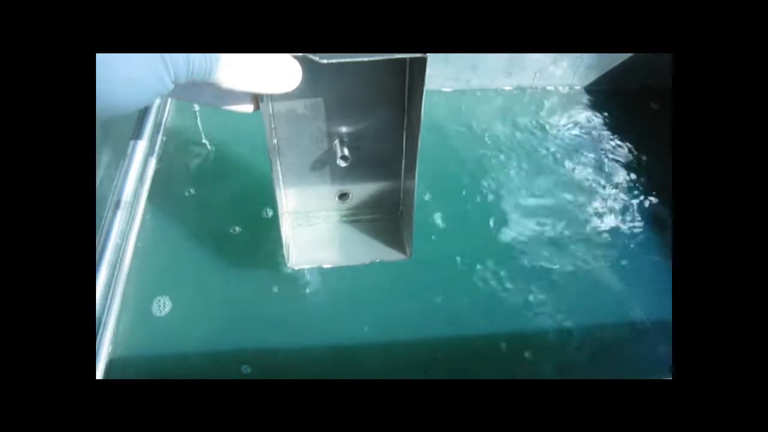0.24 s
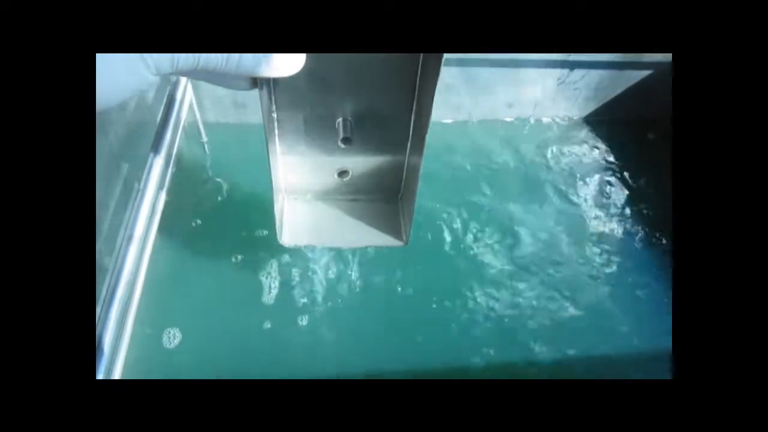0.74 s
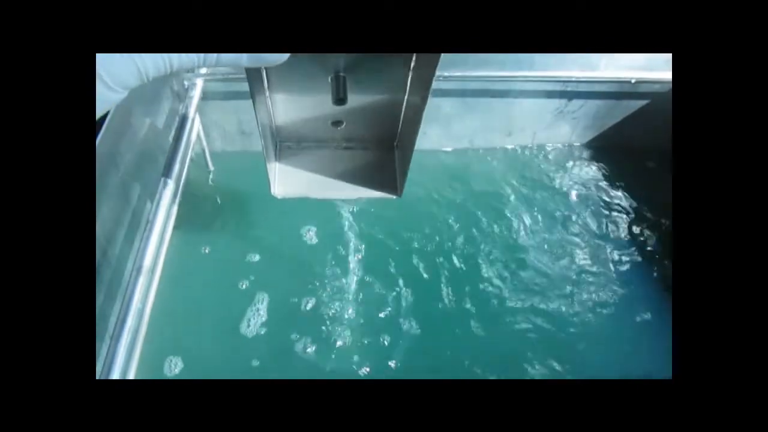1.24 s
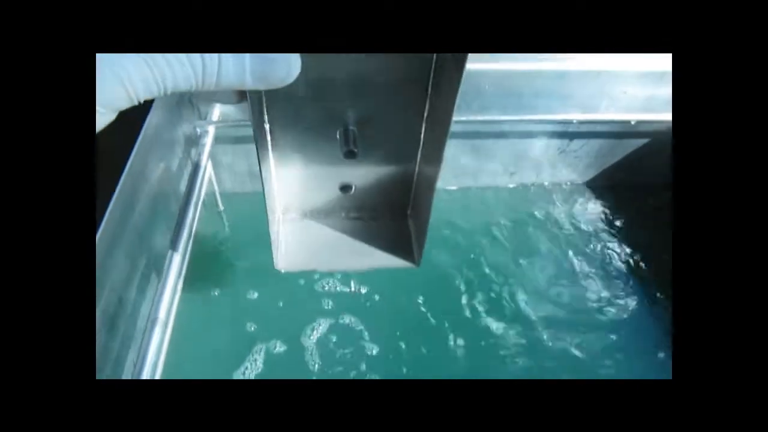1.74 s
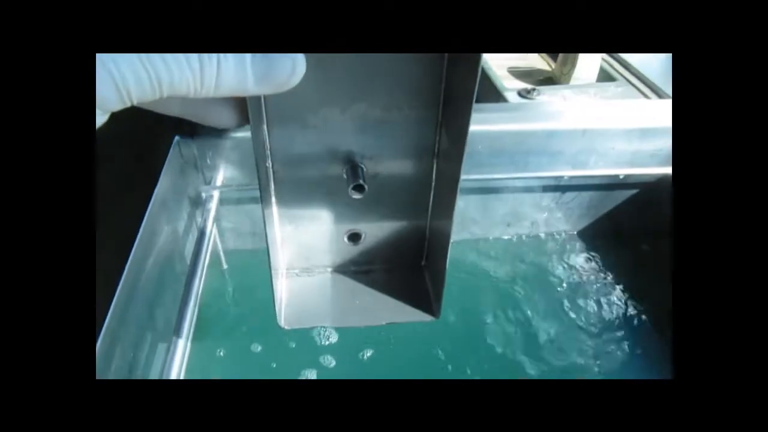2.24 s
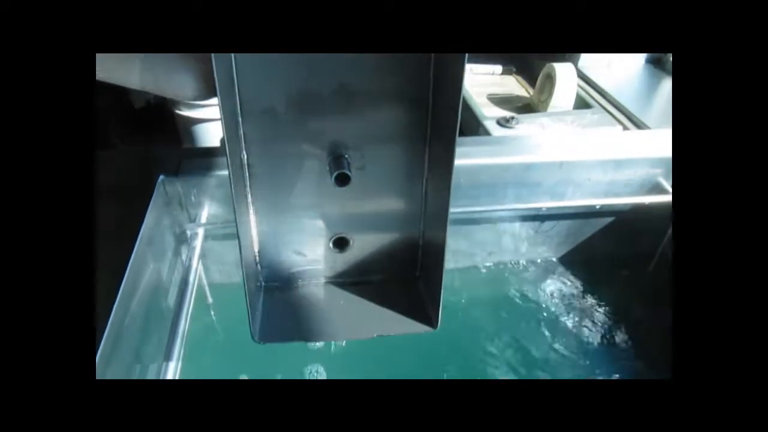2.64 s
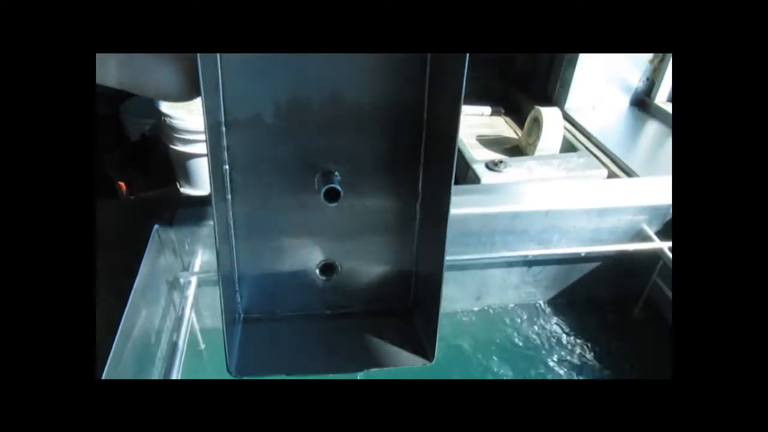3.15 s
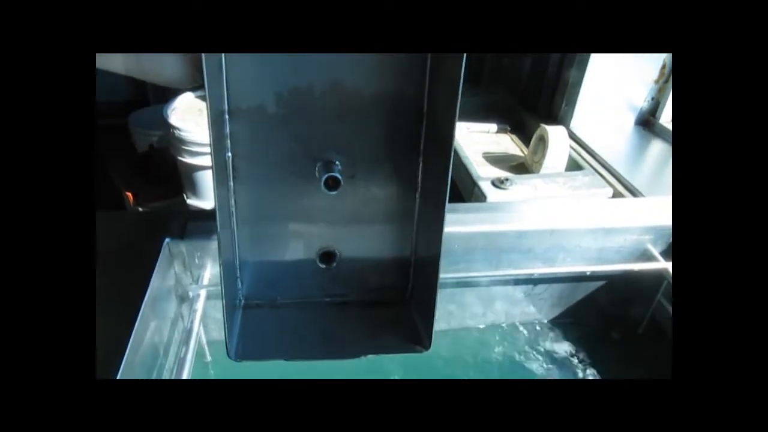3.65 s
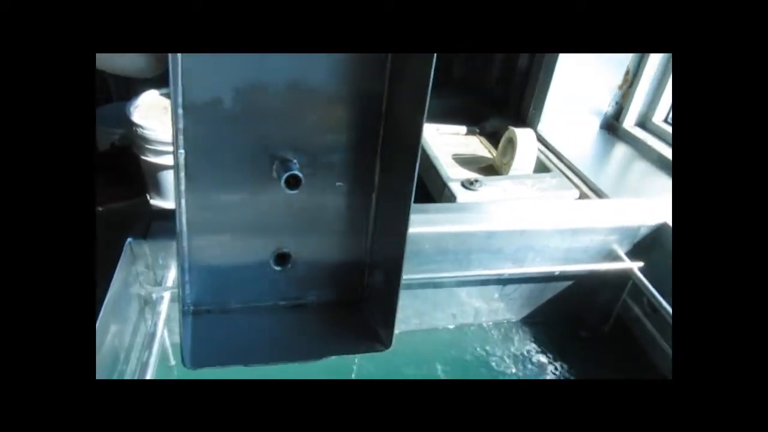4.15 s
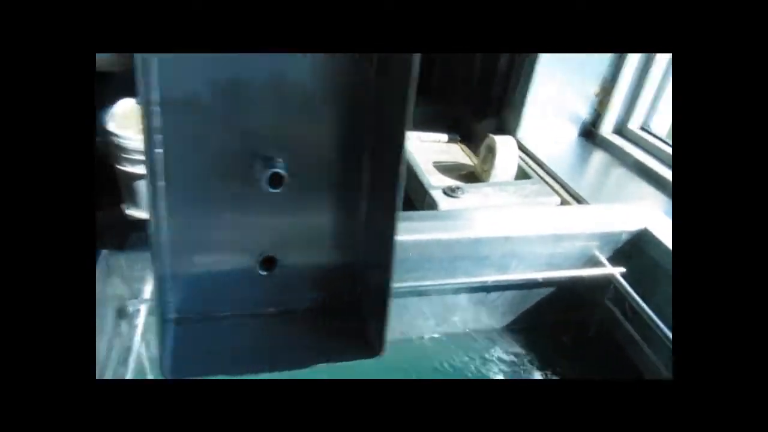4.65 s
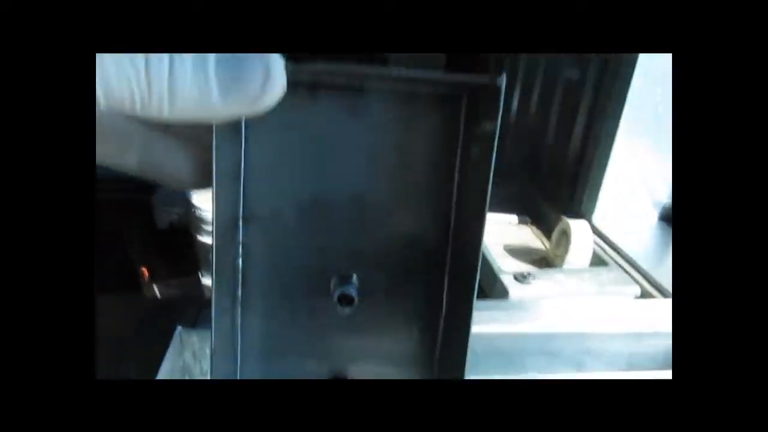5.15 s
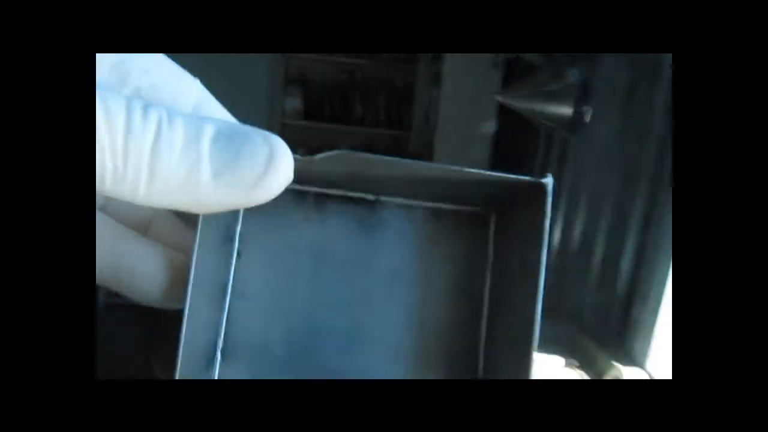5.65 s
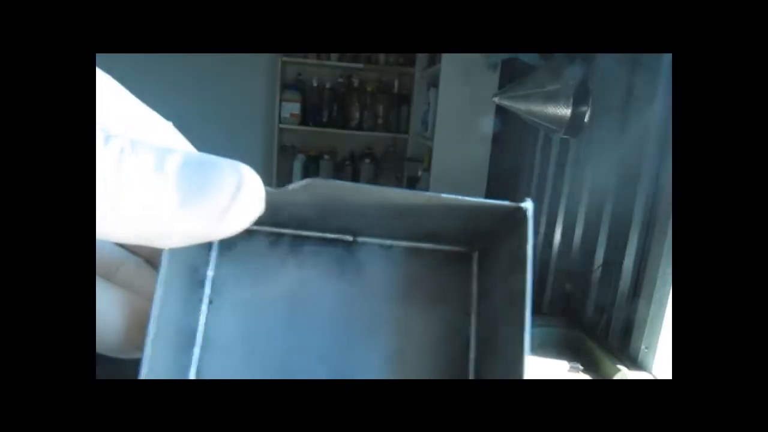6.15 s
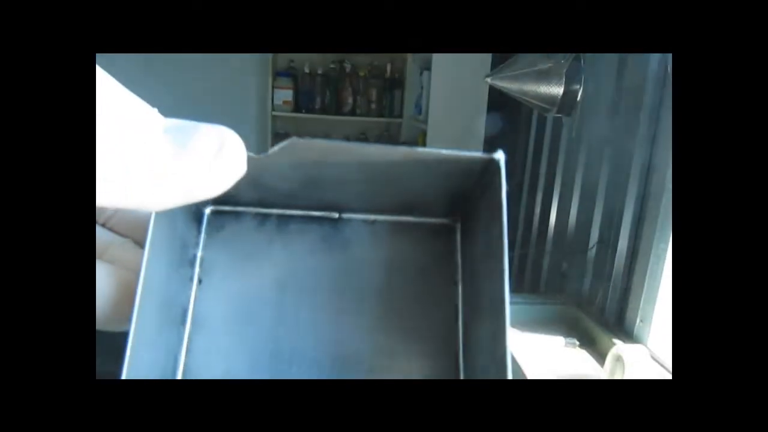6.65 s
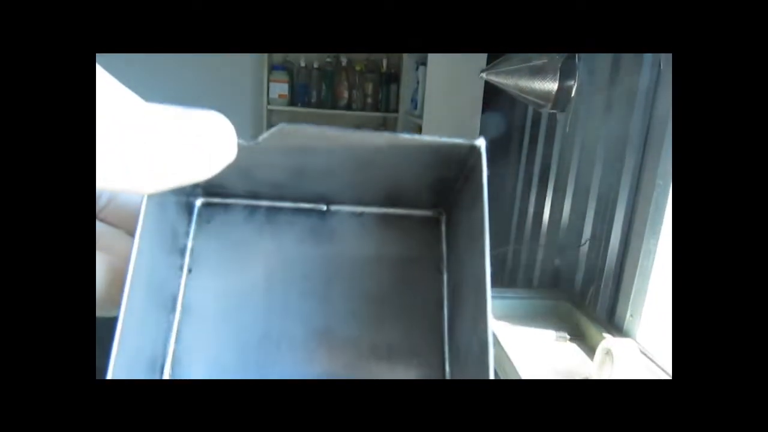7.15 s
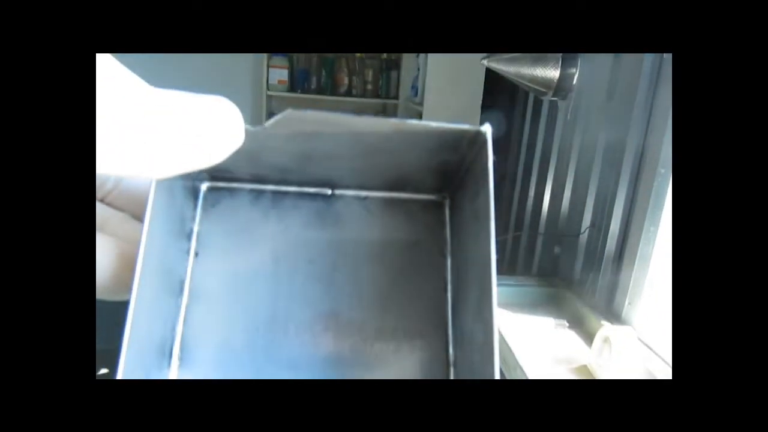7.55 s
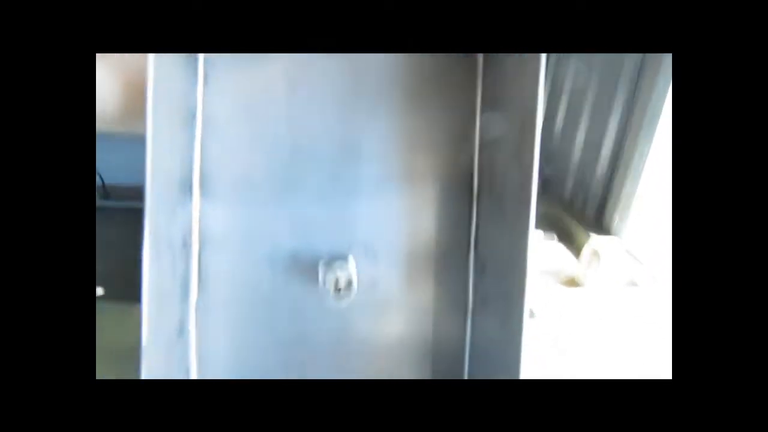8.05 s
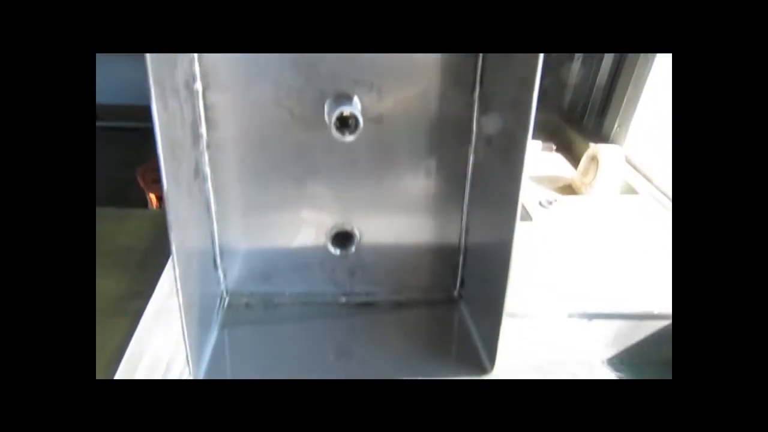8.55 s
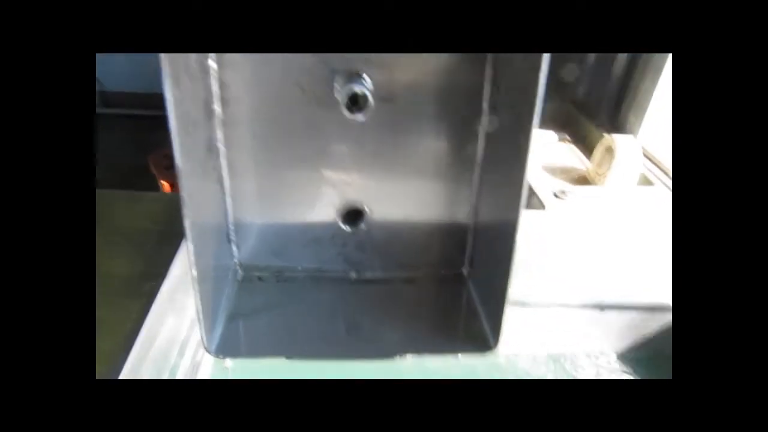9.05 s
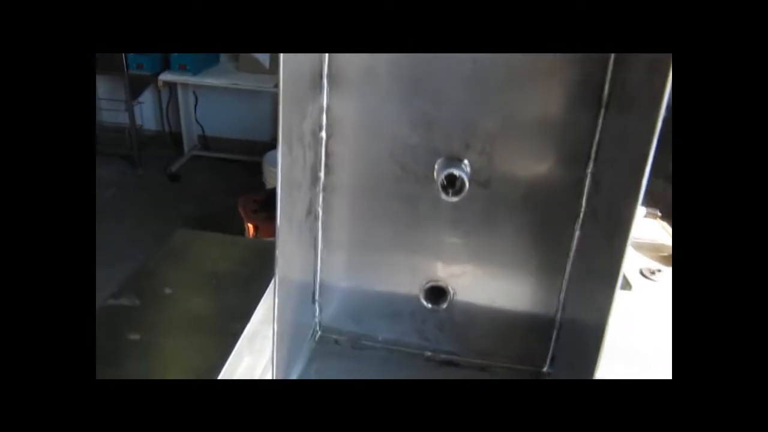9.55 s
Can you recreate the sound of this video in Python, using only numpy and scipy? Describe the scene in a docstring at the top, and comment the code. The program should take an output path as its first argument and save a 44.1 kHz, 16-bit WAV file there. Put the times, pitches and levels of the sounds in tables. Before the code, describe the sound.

A steady, high sizzle of countless tiny bubbles comes from an ultrasonic cleaning bath, near enough to slightly overload the microphone. A softer rush lies beneath it, with a faint buzzing pulse, and a barely audible low bump occurs early. The hiss eases and drops slightly in pitch as a raised steel tray shields it, then swells back a little near the end, keeping its lower tone.

```python
"""An ultrasonic cleaning tank hisses close to a small camera as countless tiny bubbles collapse in it.
The hiss is strongest around 8-10 kHz, has a softer, lower rush under it and pulses at twice the mains
rate. A steel tray is lifted out and held in front of the camera, shading the hiss and lowering its pitch;
then the camera turns to the tank's side. Early on, the hand holding it makes one soft bump. The hiss
overloads the microphone, which flattens it into a dense, even sizzle; its treble flicks wide at random."""
import sys
import numpy as np
from scipy import signal
from scipy.fft import rfft, irfft
from scipy.io import wavfile
from scipy.ndimage import uniform_filter1d

SR = 44100
rng = np.random.default_rng(int(sys.argv[2]) if len(sys.argv) > 2 else 0)


def int16_out(signal):
    """Quantize to a 16-bit WAV file."""
    q = np.round(np.clip(np.atleast_2d(signal).T, -1, 1) * 32767)
    wavfile.write(sys.argv[1], SR, q.astype(np.int16))


N = 432180
TIME = np.arange(N) / SR


def undb(db):
    """Turn decibels into a number to multiply the sound by."""
    return 10 ** (np.asarray(db) / 20)


def colour(sound, points):
    """Shape the tone along (Hz, dB) points, fading it beyond them, and scale it to a strength of 1."""
    hz, db = np.transpose(points)
    freqs = np.fft.rfftfreq(N, 1 / SR) + 1
    curve = undb(np.interp(np.log(freqs), np.log(hz), db))
    edge_fade = np.minimum(freqs / hz[0], 1) ** 2 * np.minimum(hz[-1] / freqs, 1) ** 10
    shaped = irfft(rfft(sound) * curve * edge_fade, N)
    return shaped / shaped.std()


def waver(per_s):
    """A smooth random drift, about 1 in size, heading for a new value per_s times a second."""
    hold = int(SR / per_s)
    steps = np.repeat(rng.standard_normal(N // hold + 1), hold)
    smooth = uniform_filter1d(uniform_filter1d(steps, hold), hold)[:N]
    return smooth / smooth.std()


def mains_pulse(depth, pulse_hz=120):
    """The parts that shake the water swell on each half wave of the mains power."""
    return 1 + depth * np.cos(2 * np.pi * pulse_hz * TIME)


def collapses(spread_db):
    """Countless bubble collapses of uneven size, so dense that they merge into noise."""
    return rng.standard_normal(N) * undb(spread_db * rng.standard_normal(N))


def tank_hiss(shaded, beside, loss_db):
    """Collapsing bubbles ring the steel tank; the path to the camera decides which pitches lead."""
    # The tone of the hiss over the open water, behind the raised tray and beside the tank.
    # Each row: frequency in Hz, relative level in dB.
    open_bath = [(2500, -24.5), (4200, -17), (4900, -15), (6300, -13), (7300, -9.5), (8100, -7),
                 (8500, -3.5), (9000, -2), (9700, 0), (10300, -1), (11000, -4.5), (12200, -8),
                 (14000, -15.5), (15600, -21)]
    behind_tray = [(2500, -28), (4200, -18.5), (4900, -12.5), (6300, -12), (7400, -7.5), (8050, 1.7),
                   (8500, 1), (9000, -1), (9700, 0.2), (10300, -4.5), (11000, -9.5), (12200, -13.5),
                   (14000, -17.5), (15600, -24)]
    beside_tank = [(2500, -25.5), (4000, -19.5), (5000, -13), (6300, -10.5), (7300, -3.5), (8100, -0.5),
                   (8500, 1), (9000, -4), (9700, -6.5), (10300, -9), (11000, -12.5), (12200, -13.5),
                   (14000, -23.5), (15600, -30)]
    paths = [colour(collapses(spread_db=2.0), tone) for tone in (open_bath, behind_tray, beside_tank)]
    shares = np.clip([1 - shaded - beside, shaded, beside], 0, 1)
    hiss = np.sum(np.sqrt(shares / shares.sum(axis=0)) * paths, axis=0)
    # The hiss loses less to the tray than the rush does, and is a little stronger beside the tank.
    level_db = -12 - 0.36 * loss_db + 1.5 * beside
    waver_db = 0.82 * waver(per_s=12)  # the bubble clouds shift
    return hiss * undb(level_db + waver_db) * mains_pulse(depth=0.085)


def water_rush(loss_db):
    """The low, broad part of the bubble noise, which carries the mains pulse most clearly."""
    # The tone of the rush. Each row: frequency in Hz, relative level in dB.
    rush_tone = [(20, -8), (60, -7.5), (150, -3), (400, 0), (1000, 0.85), (1600, 1), (2300, -1), (3500, -4),
                 (6000, -12.5), (16000, -32)]
    rush = colour(collapses(spread_db=1.8), rush_tone)
    return rush * undb(-30 - loss_db) * mains_pulse(depth=0.11)


def hand_bump(at_s=0.89, level_db=-38, fade_s=0.035, pitch_hz=24):
    """The hand shifts on the camera: a cycle or two of soft, deep bass."""
    since = TIME - at_s
    swell = np.exp(-(since / fade_s) ** 2)
    return undb(level_db) * swell * np.sin(2 * np.pi * pitch_hz * since)


def hand_move(halfway_s, takes_s):
    """A smooth move of the hand, from 0 (not begun) to 1 (done)."""
    return .5 + .5 * np.sin(np.pi * np.clip((TIME - halfway_s) / takes_s, -.5, .5))


def tray_and_camera(lift_s=3.4, glimpse_at_s=8.79, glimpse_fade_s=0.69):
    """Their moves set the shares of hiss from behind the tray and beside the tank, and the rush's loss."""
    lifted = np.minimum(TIME / lift_s, 1)  # the tray rises slowly out of the water
    covered = hand_move(halfway_s=5.49, takes_s=0.4)  # it comes up in front of the camera
    turned = hand_move(halfway_s=8.25, takes_s=1.6)  # the camera turns to the tank's side
    glimpse = np.exp(-((TIME - glimpse_at_s) / glimpse_fade_s) ** 2)  # water shows under the tray
    shaded = 0.26 * lifted * (1 - covered) + 0.93 * covered
    beside = 0.045 * (1 - turned) + 0.87 * turned
    loss_db = 2.5 * lifted + 7.5 * covered - 5 * glimpse
    return shaded * (1 - beside), beside, loss_db


def overload(sound, ceiling=0.165, hardness=3.5):
    """The microphone's input cannot follow the loud hiss and rounds off its peaks."""
    drive = signal.resample_poly(sound, 4, 1, axis=1) / ceiling  # finer time steps avoid false tones
    flattened = ceiling * drive / (1 + np.abs(drive) ** hardness) ** (1 / hardness)
    return signal.resample_poly(flattened, 1, 4, axis=1)


def treble_flicks(sound, per_s=4, fade_s=0.013, above_hz=4300):
    """At random instants the treble spreads between the ears while its power stays the same."""
    width = np.zeros(N)
    for when, size in rng.random((int(per_s * N / SR), 2)):
        width_db = -12.75 + 7 * size
        width += undb(width_db) * np.exp(-2 * ((TIME - when * N / SR) / fade_s) ** 2)
    width = np.clip(width, 0, np.sqrt(.5))
    treble = signal.sosfiltfilt(signal.butter(12, above_hz, "high", fs=SR, output="sos"), sound)
    # A delayed copy, upside down in one ear, sounds wide.
    wide_treble = np.roll(treble, SR // 20, axis=1) * np.array([[1], [-1]])
    return sound + (np.sqrt(1 - width ** 2) - 1) * treble + width * wide_treble


def scene():
    """The tank's hiss and rush and the hand's bump reach both ears alike."""
    shaded, beside, loss_db = tray_and_camera()
    mix = tank_hiss(shaded, beside, loss_db) + water_rush(loss_db) + hand_bump()
    return np.tile(mix, (2, 1))


def record(dry):
    """The microphone overloads and softens the treble; the treble flicks wide and its very top is cut."""
    soften_hz, top_hz, gain_db = 13000, 15700, 0.82
    softened = undb(gain_db) * signal.lfilter(*signal.butter(1, soften_hz, fs=SR), overload(dry))
    top_cut = signal.ellip(12, .1, 80, top_hz, fs=SR, output="sos")
    return signal.sosfilt(top_cut, treble_flicks(softened))


dry = scene()
out = record(dry)
int16_out(out)
```